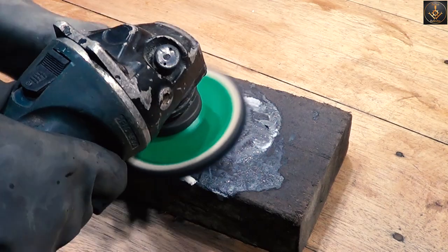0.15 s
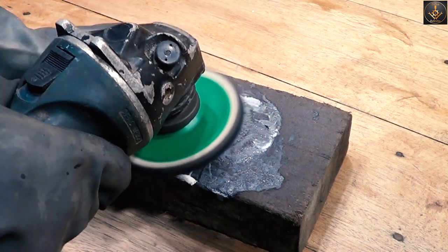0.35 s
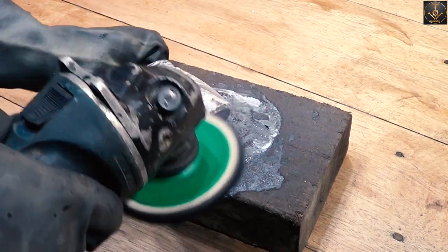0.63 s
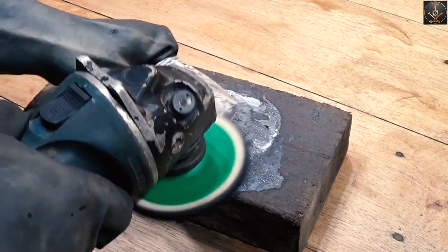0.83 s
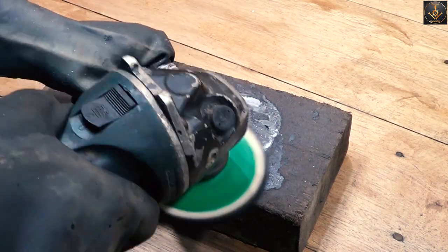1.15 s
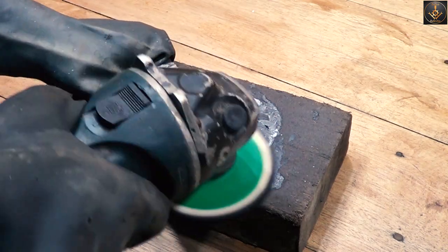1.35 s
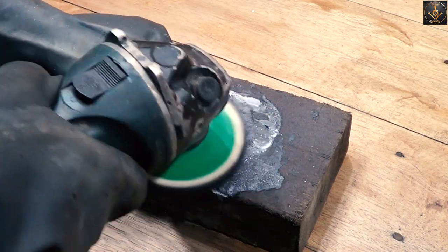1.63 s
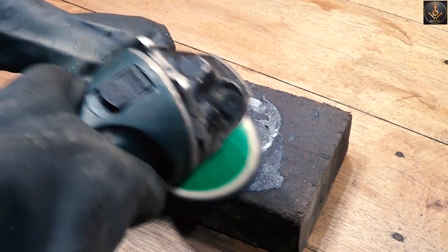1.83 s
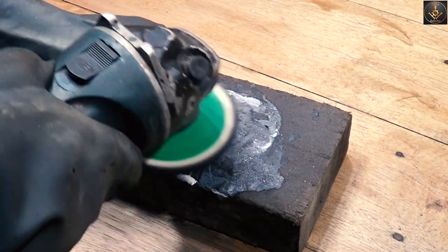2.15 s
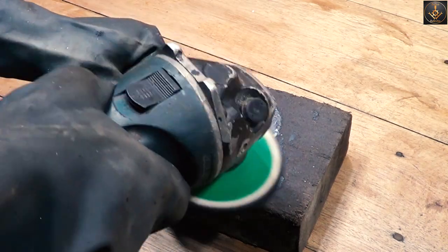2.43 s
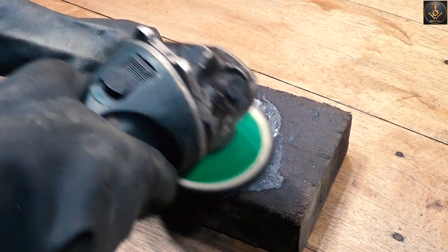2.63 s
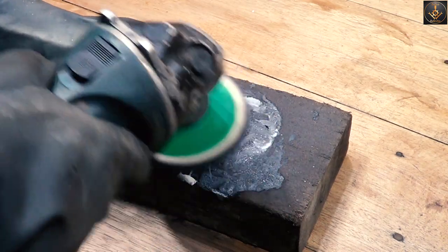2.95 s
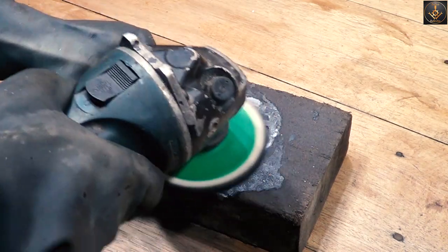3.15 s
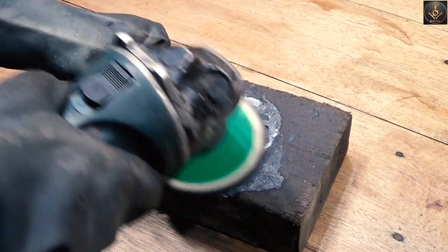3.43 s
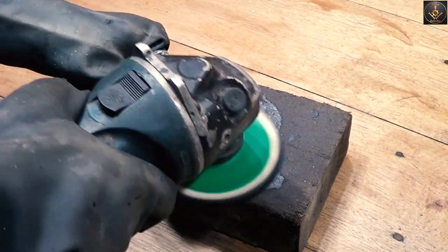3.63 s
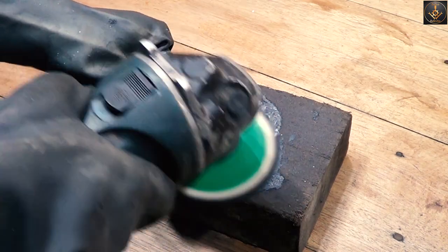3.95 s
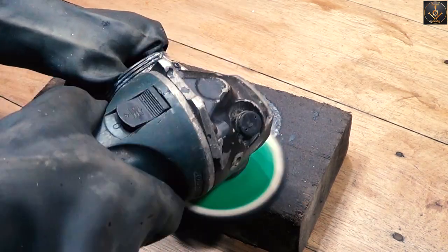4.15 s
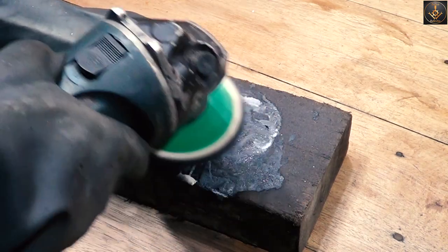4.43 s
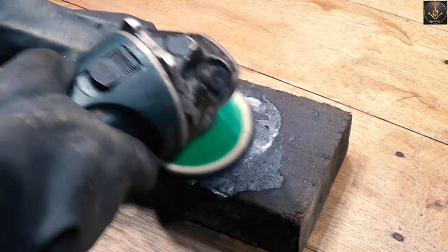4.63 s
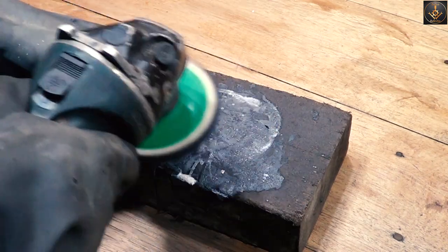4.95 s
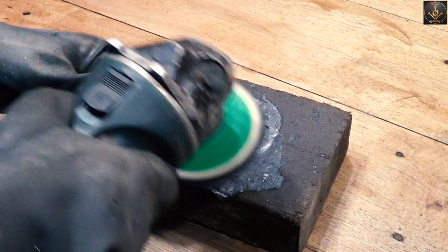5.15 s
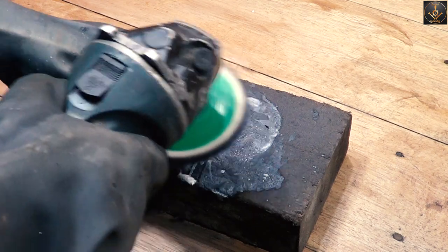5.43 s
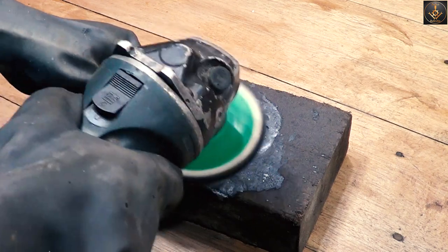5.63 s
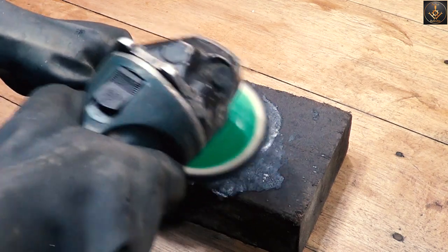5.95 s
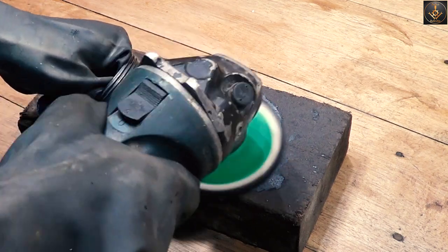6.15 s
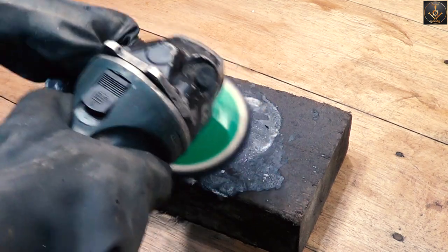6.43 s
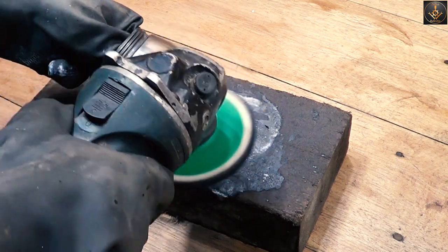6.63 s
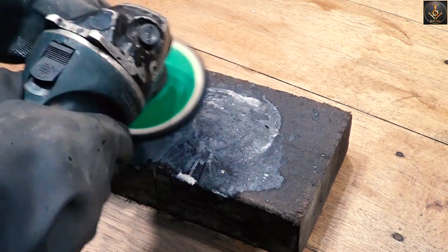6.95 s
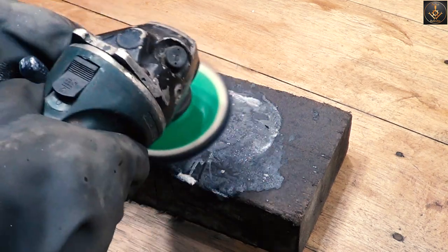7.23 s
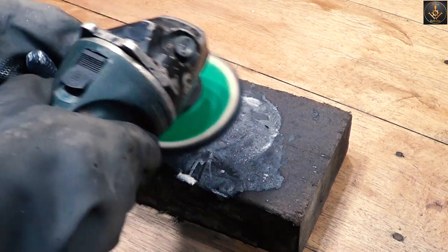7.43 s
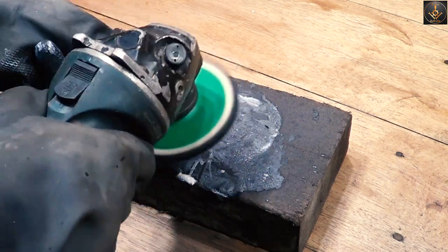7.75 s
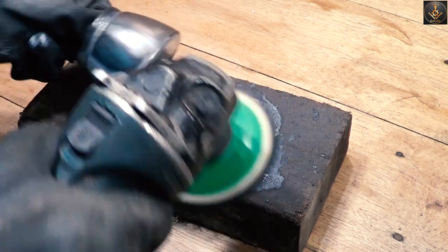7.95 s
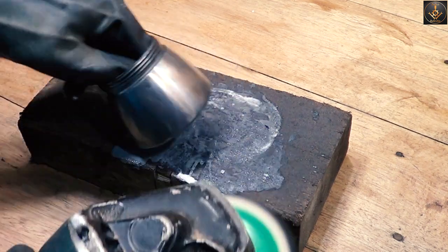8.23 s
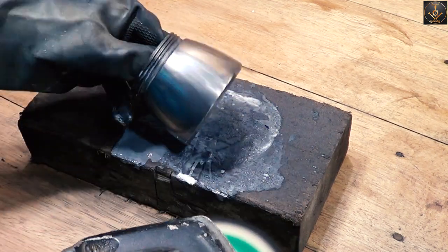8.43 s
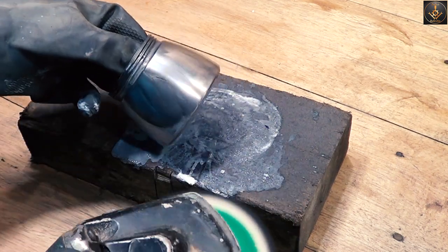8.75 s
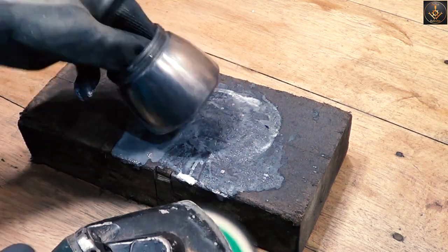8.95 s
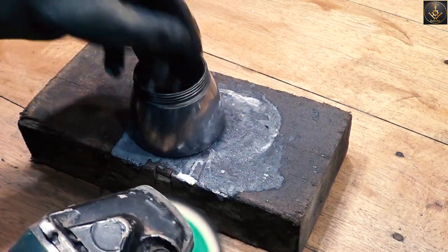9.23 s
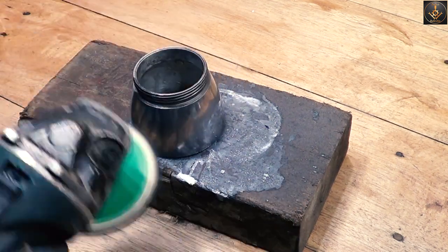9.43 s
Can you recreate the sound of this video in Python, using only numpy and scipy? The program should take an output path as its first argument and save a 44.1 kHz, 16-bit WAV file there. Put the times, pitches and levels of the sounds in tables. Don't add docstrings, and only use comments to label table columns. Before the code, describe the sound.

Close, dry stereo sound of an electric grinder buffing a small metal pot on a bench: layered motor and gear whines in hissing cooling air and soft pad friction. It begins free and high, bogs down with small uneven pressure dips, jumps to a lower pace halfway, then rises as it is lifted and glides down after switch-off, without fully stopping.

```python
import sys
import numpy as np
from scipy import signal
from scipy.io import wavfile
from scipy.ndimage import uniform_filter1d

SR = 44100
rng = np.random.default_rng(int(sys.argv[2]) if len(sys.argv) > 2 else 0)


def volts_from_db(level):
    exponent = np.asarray(level, float) / 20
    return 10 ** exponent


def to_wav(s):
    ch = np.atleast_2d(s).T
    pcm = np.round(np.clip(ch, -1, 1) * 32767)
    wavfile.write(sys.argv[1], SR, pcm.astype(np.int16))


N = 422478

# [t/s, f/Hz]
SHAFT_HZ = [(0.0, 456.7), (0.583, 456.7), (0.97, 394.3), (1.65, 381.2), (3.05, 406.8), (3.244, 429.5),
            (3.5, 400.2), (4.1, 396.1), (4.82, 411.4), (4.824, 298.4), (5.36, 314.3), (7.04, 300.4),
            (7.24, 333.0), (7.93, 294.8), (8.12, 332.5), (8.25, 343.1), (8.45, 351.7), (8.91, 352.7)]
# [t/s, speed sag/%]
PRESSES_PCT = [(0.983, 1.78), (1.327, 0.88), (1.551, 1.13), (1.696, 0.82), (2.025, 1.72), (2.305, 1.32),
               (2.604, 1.7), (2.704, 0.61), (3.013, 1.02), (3.138, 1.42), (3.966, 2.3), (4.116, 2.64),
               (4.23, 1.12), (4.485, 1.09), (4.62, 1.52), (4.834, 1.31), (5.078, 1.83), (5.453, 0.68),
               (5.622, 1.89), (5.862, 0.85), (6.061, 0.82), (6.236, 0.9), (6.395, 1.84), (6.58, 1.63),
               (6.715, 2.17), (6.805, 0.81), (7.049, 3.01), (7.533, 1.28), (7.683, 1.73), (7.947, 2.14)]
# [t/s, stage/index]
STAGES = [
    (0, 0),
    (.8, 0),
    (1, 1),
    (4.82, 1),
    (4.83, 2),
    (8, 2),
    (8.3, 3),
    (8.92, 3),
    (9.08, 4),
]
# [multiple of shaft/1, then rms level/dB when idling, pressed, pressed at lower pace,
# lifted, running down]
STRONG_DB = [(3.167, -57.9, -57.7, -65.6, -66.2, -66.3), (5, -66.6, -60.6, -58.1, -86.2, -64.7),
             (15.833, -64.8, -67.3, -60.7, -75.2, -61.8), (19, -56.9, -58.1, -57.7, -53.1, -58.7),
             (38, -44.1, -46.2, -59.4, -61.2, -58.4)]
STRONG_TRIM_DB = (.3, 1, 0, 1.3, 1.3)
STRONG_SWAY = (1.4, 0.9, 1.2, 1.2, 1.2)
# [multiple of shaft/1, then rms level/dB when idling, pressed, pressed at lower pace,
# lifted, running down]
WEAK_DB = [(1, -70.5, -74, -75, -78.5, -81), (2, -77, -78, -77, -73, -85), (3, -68, -67, -65, -68, -67),
           (4, -66, -66, -67, -67, -85), (6, -70, -67, -69, -72, -70),
           (6.333, -60.5, -72, -76, -68, -72), (7, -70, -70, -69, -72, -72),
           (8, -85, -69, -65, -71, -82), (9, -59.5, -83, -72, -68, -85), (9.5, -66, -63, -62, -62, -62),
           (12.667, -54, -59, -60, -62, -63),
           (15, -72, -62, -64, -85, -72), (20, -84, -62, -63, -85, -85),
                (22.167, -64, -69, -66, -66, -62), (28.5, -65, -63, -65, -55, -70),
                (31.667, -68, -64, -66, -65, -64), (34.833, -85, -70, -70, -70, -60),
                (37, -85, -63, -66, -72, -85), (39, -85, -63, -64, -85, -85),
                (41.167, -85, -73, -64, -57, -64), (44.333, -85, -85, -64, -60, -62)]
# [multiple/1, f/Hz, level/dB, width/Hz]
RINGS_DB = [(3.167, 599, -8.1, 48), (3.167, 790, 2.4, 63), (3.167, 992, 3.0, 12), (3.167, 992, 9.5, 79),
            (3.167, 1246, 6.0, 25), (3.167, 1253, -1.7, 15), (5, 940, -12.2, 75), (5, 1529, -2.5, 18),
            (5, 1745, 13.9, 35), (5, 2272, 7.0, 182), (15.833, 3200, -13.6, 256), (15.833, 4900, 4.8, 59),
            (15.833, 5762, 6.7, 461), (15.833, 6009, 7.6, 210), (15.833, 7066, -6.5, 85),
            (19, 3934, -12.3, 315), (19, 5031, -4.8, 176), (19, 5538, 3.8, 111), (19, 5951, -6.8, 119),
            (19, 6511, -12.6, 78), (19, 7211, -8.5, 87), (19, 7611, 4.7, 609), (38, 9648, -13.1, 772),
            (38, 9648, 4.9, 338), (38, 11620, 4.7, 232), (38, 13101, -7.1, 157), (38, 13180, 7.4, 461),
            (38, 14950, -1.4, 179), (38, 15221, -11.8, 533)]
# [multiple/1, f/Hz, level/dB, width/Hz]
RUNDOWN_RINGS_DB = [(1, 218, 7, 22), (3.167, 510, -12, 50), (3.167, 660, -4, 60), (3, 985, 5, 30),
                    (3, 1250, 6, 35), (5, 820, -10, 60), (5, 1200, -7, 150), (9.5, 1700, -8, 350),
                    (12.667, 2300, -8, 500), (15.833, 2650, -12, 250), (19, 3250, -12, 300),
                    (34.833, 6400, 3, 600), (38, 6600, 7.5, 800), (41.167, 7400, 3, 600)]
# [t/s, loss/dB]
COAST_DB = [(9.0, -0.5), (9.3, 2.5), (9.58, 13)]
# [t/s, loss/dB, length/s]
TURNS_DB = [(0.902, 1.6, 0.02), (1.07, 1.3, 0.03), (1.473, 2.5, 0.022), (1.74, 2, 0.024), (2.03, 0.5, 0.02),
            (2.503, 1.3, 0.037), (3.203, 1.5, 0.045), (3.746, 1.8, 0.088), (4.337, 1.3, 0.035),
            (4.862, 5, 0.02), (4.964, 3, 0.02), (5.108, 2.5, 0.027), (5.325, 1.5, 0.012),
            (5.463, 0.4, 0.027), (5.627, 1.5, 0.057), (5.75, 1, 0.036), (6.063, 1.6, 0.026),
            (6.4, 2.7, 0.018), (6.485, 1.3, 0.09), (6.575, 3, 0.017), (7.03, 3, 0.048), (7.924, 5, 0.03),
            (8.147, 2.5, 0.038), (8.281, 0.5, 0.02), (8.576, 1.5, 0.11), (9.099, 1, 0.059),
            (9.213, 2.5, 0.017), (9.354, 0.5, 0.016)]
# [t/s, fifth-order loss/dB, length/s]
HOPS_DB = [(.75, 8, .05), (3.175, 15, 0.052), (4.798, 7, 0.064), (7.11, 18, 0.041), (7.98, 11, 0.044)]
# [t/s, level/dB, pad rub above it/dB]
ROAR_DB = [(0, -38.5, 3), (.7, -38.5, 2.5), (1.1, -38.5, 5.5), (4.8, -38, 4), (4.9, -36.5, -4.5),
           (6.9, -38.5, -3), (7.2, -37, -5.5), (7.7, -37.5, -4.5), (7.84, -36.5, -7), (8.05, -37, -3.5),
           (8.25, -38, 1.5), (8.9, -38.5, 1.5), (9.58, -42, 5.5)]
# [f/Hz, density/dB per Hz]
OVER_WORK_DB = [(50, -115), (520, -113), (800, -102), (1200, -97), (1950, -89.5), (2500, -88.5),
                (3100, -85), (4200, -83.5), (5700, -78.5), (7000, -82.5), (10300, -82.5), (11700, -90),
                (14400, -80), (15900, -83)]
# [f/Hz, density/dB per Hz]
LOWER_PACE_DB = [(50, -115), (400, -111), (650, -101), (950, -89.5), (1500, -83), (2500, -85.5),
                 (4500, -80), (6000, -81.5), (7300, -80), (8400, -83), (9100, -89), (10300, -86),
                 (11600, -80), (15900, -84)]
# [f/Hz, density/dB per Hz]
LIFTED_DB = [(50, -118.5), (420, -113), (750, -100), (1500, -93), (2000, -84.5), (2800, -86), (4200, -78),
             (5800, -84.5), (8000, -82.5), (9400, -85.5), (11000, -82.5), (12500, -83.5), (13600, -78.5),
             (15900, -85)]
# [f/Hz, density/dB per Hz]
COASTING_DB = [(50, -118), (350, -117), (700, -100), (1200, -92.5), (2000, -82), (3100, -87), (4400, -81.5),
               (5400, -85), (6600, -81), (9500, -87.5), (11000, -81), (12200, -82), (14000, -80.5),
               (15900, -83)]
# [t/s, share/1]
LIFT_SHARE = [(7.96, 0.014), (8.12, 0.97)]
# [t/s, share/1]
SLOW_SHARE = [(8.95, 0.02), (9.15, 0.81)]
# [f/Hz, correlation/1]
PORT_LIKENESS = [(60, .85), (300, .9), (1400, .88), (4000, .89), (15000, .87)]
# [f/Hz, level/dB]
PORT_LEAN_DB = [(60, -3.5), (300, 3.5), (700, 0.5), (1300, 3.5), (2400, 3), (5000, 2), (15000, .5)]
# [f/Hz, phase/rad]
PORT_LEAD_RAD = [(100, 0.034), (1300, 0.36), (3500, .1), (16000, .08)]


def evened(x):
    return x / np.sqrt(np.mean(x ** 2) + 1e-20)


def at_time(points, t):
    return np.interp(t, *np.transpose(points))


def at_hz(points, hz):
    f, value = np.transpose(points)
    return np.interp(np.log(hz + 1), np.log(f + 1), value)


def bumps(x, rows):
    return sum(height * np.exp(-.5 * ((x - centre) / width) ** 2) for centre, height, width in rows)


def wander(per_s, count, size=1):
    knots = rng.standard_normal((count, 1500))
    place = np.arange(0, N, size) / SR * min(per_s, 150)
    return [1.22 * np.interp(place, np.arange(1500), k) for k in knots]


def snapped(multiple):
    return round(6 * multiple) / 6


def shaft(press_s=.04, off_s=8.915, drag_per_s=.76, friction_hz=109):
    t = np.arange(N) / SR
    coarse_t = t[::64]
    presses = [(s, sag_pct, press_s) for s, sag_pct in PRESSES_PCT]
    sag_pct = np.interp(t, coarse_t, bumps(coarse_t, presses))
    driven_hz = at_time(SHAFT_HZ, t) * np.exp(-sag_pct / 100)
    coasting = np.exp(-drag_per_s * np.maximum(t - off_s, 0))
    return (driven_hz + friction_hz) * coasting - friction_hz


def order_levels(t, shaft_hz, follow=0.88, usual_db=-39, loudest_db=-50):
    stage = at_time(STAGES, t)
    turn_db = bumps(t, TURNS_DB)
    lines = []
    for (multiple, *stage_db), sway, trim_db in zip(STRONG_DB, STRONG_SWAY, STRONG_TRIM_DB):
        order = snapped(multiple)
        rings = [ring for owner, *ring in RINGS_DB if owner == multiple]
        db = np.interp(stage, range(5), stage_db) + trim_db
        db = db + bumps(order * shaft_hz, rings) - sway * turn_db
        if order == 5:
            db = db - bumps(t, HOPS_DB)
        lines.append((order, np.minimum(db, loudest_db)))

    roar_db = np.interp(t, *np.transpose(ROAR_DB)[:2])
    grip_db = follow * (roar_db - turn_db - usual_db)
    coast_db = at_time(COAST_DB, t)
    for multiple, *stage_db in WEAK_DB:
        db = np.interp(stage, range(5), stage_db) + grip_db - coast_db * (multiple < 8)
        lines.append((snapped(multiple), db))

    ringing = []
    for order, db in lines:
        rings = [ring for owner, *ring in RUNDOWN_RINGS_DB if snapped(owner) == order]
        ringing.append((order, db + bumps(order * shaft_hz, rings)))
    return ringing


def whine(shaft_hz, blur_turns=0.0024, blur_per_s=90, drift_db=2.5):
    bite_order, bite_db, bite_rad, bites_per_s = 5, 2.3, .55, 40
    judder_rad = .025
    t = np.arange(N) / SR
    coarse_t, coarse_hz = t[::64], shaft_hz[::64]
    turns = np.cumsum(shaft_hz) / SR + blur_turns * wander(blur_per_s, count=1)[0]
    lines = order_levels(coarse_t, coarse_hz)
    swings = wander(45, count=len(lines), size=64)
    drifts = wander(6, count=len(lines), size=64)
    loaded = np.minimum(at_time(STAGES, t), 1)
    bite, slip = (loaded * curve for curve in wander(bites_per_s, count=2))
    out = np.zeros((2, N))
    for (order, db), swing, drift in zip(lines, swings, drifts):
        hz = order * coarse_hz
        lean_db = at_hz(PORT_LEAN_DB, hz) / 2 + drift_db * drift * min(order / 6, .5)
        slip_rad = order * judder_rad
        if order == bite_order:
            db = db + bite_db * bite[::64]
            slip_rad += bite_rad
        size = np.sqrt(2) * volts_from_db(db) * (1 + .085 * np.log(order + .3) * swing)
        left = np.interp(t, coarse_t, size * volts_from_db(lean_db))
        right = np.interp(t, coarse_t, size / volts_from_db(lean_db))
        lead = np.interp(t, coarse_t, at_hz(PORT_LEAD_RAD, hz))
        angle = 2 * np.pi * (order * turns + rng.random()) + slip_rad * slip
        out[0] += left * np.sin(angle + lead / 2)
        out[1] += right * np.sin(angle - lead / 2)
    return out


def roar_colour(t, hz, pace_s):
    work_db = np.where(t < pace_s, at_hz(OVER_WORK_DB, hz), at_hz(LOWER_PACE_DB, hz))
    lifted = np.clip(at_time(LIFT_SHARE, t), 0, 1)
    slow = np.clip(at_time(SLOW_SHARE, t), 0, 1)
    away_db = (1 - slow) * at_hz(LIFTED_DB, hz) + slow * at_hz(COASTING_DB, hz)
    colour = volts_from_db((1 - lifted) * work_db + lifted * away_db)
    return colour / np.sqrt(2 * (colour ** 2).sum(0))


def roar(shaft_hz, patchy_db=0.59, ripple_db=1.38, flicker_db=.5, throb=0.16):
    pace_s, pace = 4.822, .79
    rub_hz, rub_octaves, rub_keeps = 1450, .45, 0.17
    frames, hz = N // 128 + 9, np.fft.rfftfreq(512, 1 / SR)[:, None]
    t = np.arange(frames) * 128 / SR
    a, b, c, d, patches, ripples = rng.standard_normal((frames, 257, 6)).T
    patches = evened(uniform_filter1d(uniform_filter1d(patches, 30, 0), 24, 1))
    ripples = evened(uniform_filter1d(uniform_filter1d(ripples, 2, 0), 300, 1))
    flicker = evened(uniform_filter1d(rng.standard_normal(frames), size=4))

    s, level_db, rub_db = np.transpose(ROAR_DB)
    turn_db = bumps(t, TURNS_DB)
    level_db = np.interp(t, s, level_db) - turn_db
    rub_db = np.interp(t, s, rub_db) + rub_keeps * turn_db
    paced_hz = hz / np.where(t < pace_s, 1, pace)
    rub = np.exp(-.5 * (np.log2(paced_hz / rub_hz + 1e-3) / rub_octaves) ** 2)

    same = np.clip(at_hz(PORT_LIKENESS, hz), -1, 1)
    left = a + 1j * b
    right = same * left + np.sqrt(1 - same ** 2) * (c + 1j * d)
    right = right * np.exp(-1j * at_hz(PORT_LEAD_RAD, hz))
    lean_db = at_hz(PORT_LEAN_DB, hz) / 2
    z = np.array([left * volts_from_db(lean_db), right * volts_from_db(-lean_db)]) * roar_colour(t, hz, pace_s)
    z *= volts_from_db(level_db + rub * rub_db + patchy_db * patches + ripple_db * ripples + flicker_db * flicker)
    air = signal.istft(z, nperseg=512, noverlap=384)[1][:, :N]
    return volts_from_db(4.5) * air * (1 + throb * np.sin(2 * np.pi * np.cumsum(shaft_hz) / SR))


def hand_shake_db():
    return 0.22 * wander(60, count=1)[0] + 0.17 * wander(26, count=1)[0]


def scene():
    shaft_hz = shaft()
    return (whine(shaft_hz) + roar(shaft_hz)) * volts_from_db(hand_shake_db())


def top_cut(x):
    return signal.sosfilt(signal.butter(12, 17080, fs=SR, output="sos"), x)


def record(dry):
    edge = signal.firwin(1023, 15765, window=("kaiser", 10), fs=SR)
    mix = signal.oaconvolve(dry, edge[None], "same")
    return top_cut(mix)


dry = scene()
out = record(dry)
to_wav(out)
```